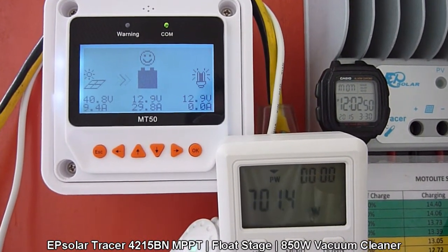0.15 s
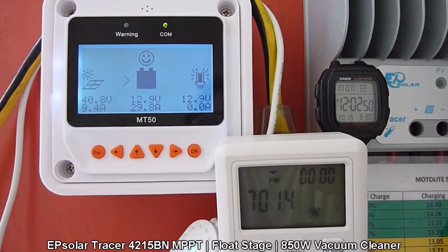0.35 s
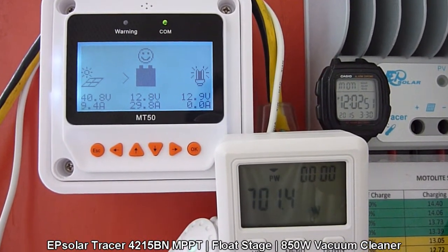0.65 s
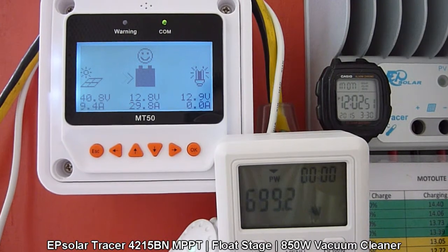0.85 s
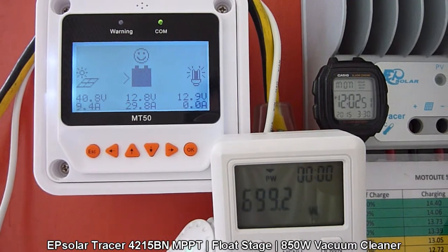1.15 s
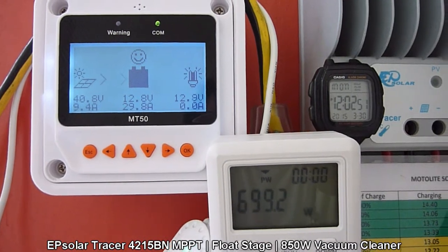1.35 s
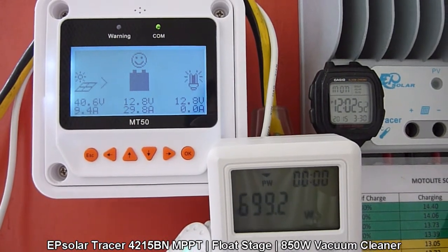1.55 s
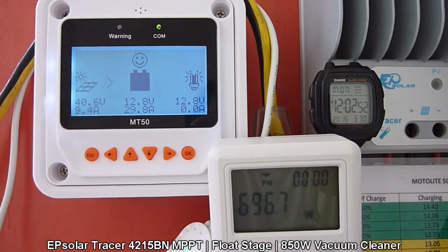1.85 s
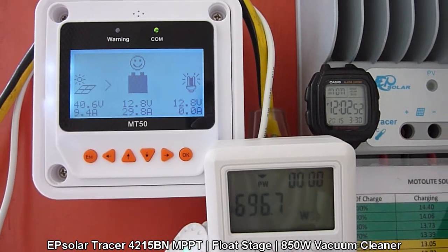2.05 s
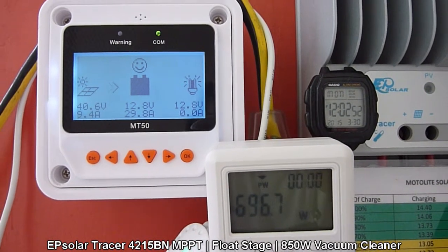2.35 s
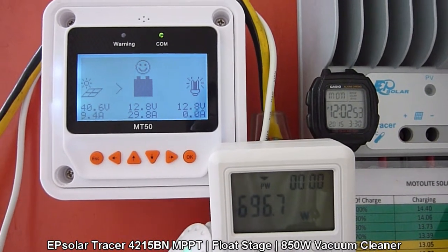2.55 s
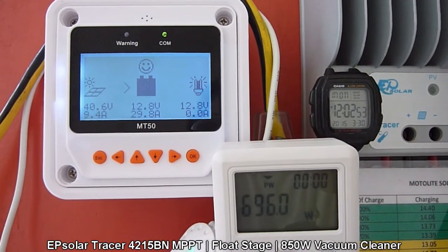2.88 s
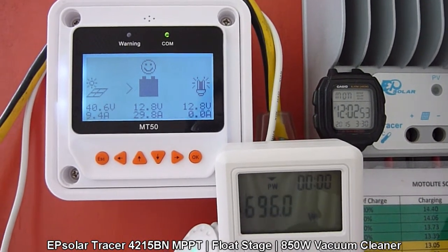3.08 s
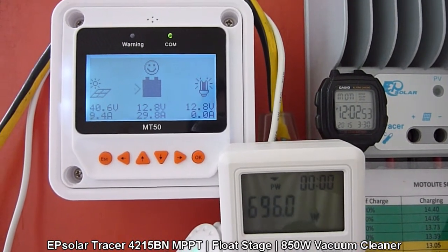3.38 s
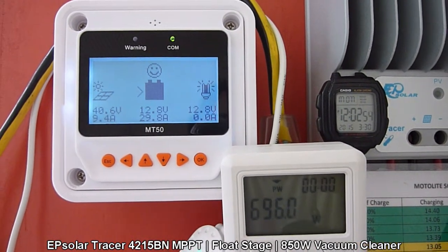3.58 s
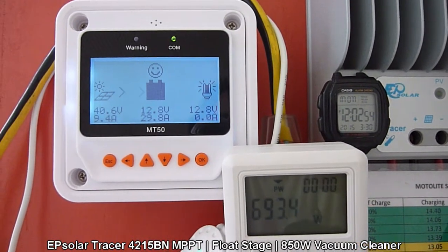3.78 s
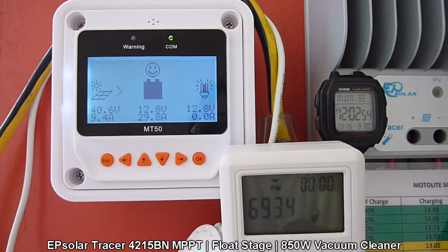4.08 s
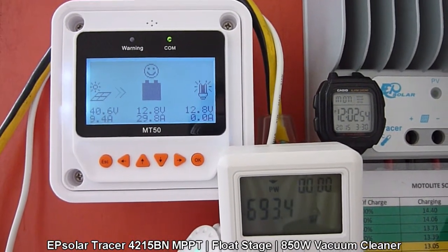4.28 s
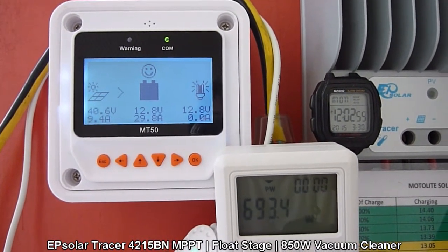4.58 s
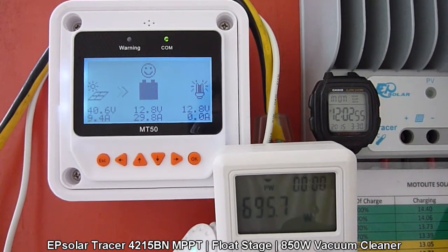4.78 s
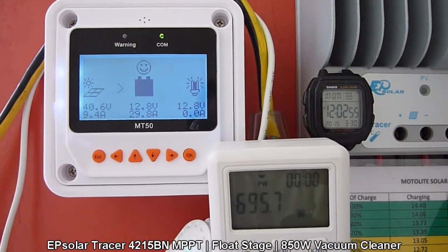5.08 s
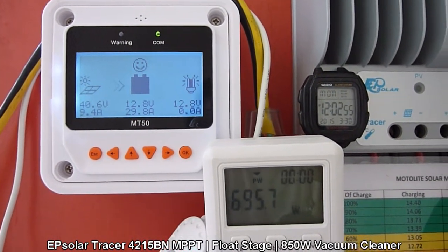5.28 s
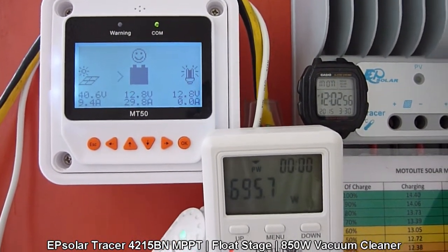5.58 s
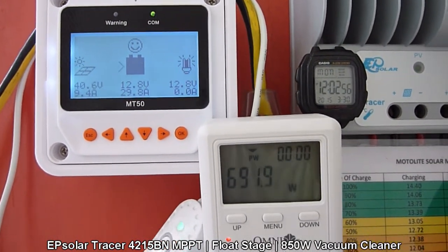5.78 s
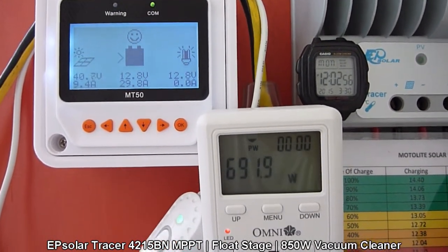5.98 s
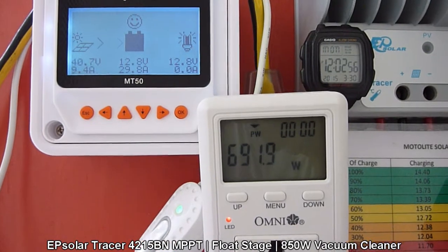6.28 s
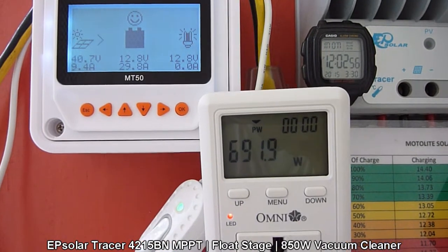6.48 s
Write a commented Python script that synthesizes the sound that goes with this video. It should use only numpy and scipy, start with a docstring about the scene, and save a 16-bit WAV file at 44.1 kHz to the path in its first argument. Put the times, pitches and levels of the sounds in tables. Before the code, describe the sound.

Unbroken indoor vacuum cleaner noise from start to finish, with no switching on or off. Hollow, boxy rushing air dominates; beneath it sits a smooth motor hum with faint electrical buzz, above it a narrow, piercing fan whine that wavers slightly in strength. Level stays almost flat. Heard through a small camera microphone in a hard little room, with restricted highs and a slight left lean.

```python
"""A vacuum cleaner runs steadily in a small hard room, slowing by a hair as it warms. Motor: sines at rotor
orders with mains sidebands, and a blade whine that follows its pitch at each port. Buzz: steady sines at mains
multiples. Air: noise shaped by many resonances, with echoes. A small camera with close stereo ports samples
slowly, so the treble returns faintly as a mirror image."""
import sys
import numpy as np
from scipy import signal
from scipy.fft import rfft, irfft
from scipy.io import wavfile

SR = 44100
rng = np.random.default_rng(int(sys.argv[2]) if len(sys.argv) > 2 else 0)


def int16_out(signal):
    """Quantize to a 16-bit WAV file."""
    q = np.round(np.clip(np.atleast_2d(signal).T, -1, 1) * 32767)
    wavfile.write(sys.argv[1], SR, q.astype(np.int16))


N = 292824
TIME_S = np.arange(N) / SR
HZ = np.maximum(np.fft.rfftfreq(N, 1 / SR), 1)

# magnetic buzz at multiples of the mains rate: [f/Hz, level/dB rms]
MAINS_BUZZ = [(60.2, -72), (120.4, -57.5), (240.75, -44.6)]


def from_db(db):
    """Amplitude gain of a level in dB."""
    return 10 ** (np.asarray(db) / 20)


def look_up(x, rows, left=None, right=None):
    """Table columns interpolated linearly at x, the first column being the key."""
    key, *columns = np.transpose(rows)
    return [np.interp(x, key, column, left=left, right=right) for column in columns]


def over_hz(points):
    """A short spectrum on the full frequency grid, linear in log frequency."""
    hz, values = np.array(points).T
    return np.interp(np.log(HZ), np.log(hz), values)


def sides(pan_db):
    """Left and right gains for a left-right level difference."""
    return from_db(np.array([pan_db / 2, -pan_db / 2]))


def drift(rate_hz):
    """Slow random drift of unit spread: white noise rolled off around rate_hz."""
    slow = irfft(rfft(rng.standard_normal(N)) / (1 + (HZ / rate_hz) ** 2), N)
    return slow / slow.std()


def tone(turns, level_db, waver_db):
    """A sine on a running phase in cycles, random start, its rms level wavering slowly."""
    wave = np.sin(2 * np.pi * (turns + rng.random()))
    gain = from_db(level_db + waver_db * drift(5.0))
    return np.sqrt(2) * gain * wave


def blade_whine(speed_hz, turns):
    """Fan blades pass at a multiple of rotor speed; the room answers unevenly at each port as pitch slides."""
    # room response to the whine: [f/Hz, left level/dB rms, right level/dB rms, left lead/cycles]
    whine_by_pitch = [(3176.5, -39.3, -40.5, .08), (3178, -39.2, -44, .06), (3180.5, -40.8, -44.5, .05),
                      (3181.5, -41.6, -46.8, .11), (3182.5, -42.8, -48.3, .18), (3183.3, -43.2, -48.5, .23),
                      (3184.4, -42.6, -47, .28), (3185.6, -42.2, -49.5, .37), (3186.6, -43.5, -50, .51),
                      (3188, -43, -52.5, .61), (3189.2, -44.5, -53, .65), (3191, -44, -50.5, .85),
                      (3192.4, -44.5, -53.5, .86), (3193.5, -43, -52, .95), (3195.3, -42.2, -52.8, 1.0)]
    blade_count = 12
    left_db, right_db, lead = look_up(blade_count * speed_hz, whine_by_pitch)
    # a short wave reaches the two ports at different points of its cycle
    port_turns = blade_count * turns + np.array([[1], [0]]) * lead
    return tone(port_turns, np.array([left_db, right_db]), waver_db=1.3)


def motor():
    """Blade whine and rotor orders; the pulsing mains torque puts a sideband on either side of each order."""
    # rotor speed: [t/s, speed/turns per s], before a small random drift
    rotor_speed = [(0, 266.33), (.3, 266.12), (.5, 266.04), (.7, 266.03), (1.1, 265.89), (1.3, 265.77),
                   (1.7, 265.62), (2.3, 265.46), (2.7, 265.27), (2.95, 265.28), (3.7, 265.16),
                   (3.9, 265.07), (4.12, 265.09), (4.28, 265.3), (4.6, 265.14), (4.9, 265.26),
                   (5.2, 265.24), (5.5, 265.0), (5.9, 264.77), (6.1, 264.68), (6.3, 264.76), (6.64, 264.74)]
    # rotor orders: [multiple of speed, level/dB rms before room gain, left-right/dB before room shift,
    # left lead/cycles, lower mains sideband re order/dB, upper mains sideband re order/dB]
    rotor_orders = [(1, -37.5, 2.1, .01, -33, -14), (2, -60, 2.1, .02, -30, -30),
                    (4, -57, 2.1, .05, -30, -30), (6, -44.3, 6.5, .13, -30, -30),
                    (7, -57, 1.5, .08, -30, -30), (14, -54.5, 0, .05, -8, -6),
                    (18, -69, 2.1, .07, -30, -30)]
    # room lifting or swallowing the orders as they slide: [f/Hz, gain/dB, left-right shift/dB]
    order_by_pitch = [(1588, 0, -2), (1591, 0, 0), (1594, 1, -1), (1596, -1, -2), (1598, -2.5, -4),
                      (1700, 0, 0), (3706, -2, 2), (3711, -3, 2), (3714, -1, 1), (3718, 3.5, -3),
                      (3722, 1, -8), (3725, -1, -12), (3728, -3, -8)]

    speed_hz = look_up(TIME_S, rotor_speed)[0] + .025 * drift(7.0)
    turns = np.cumsum(speed_hz) / SR
    pulsing = MAINS_BUZZ[1][0] * TIME_S
    left_only = np.array([[1], [0]])
    out = blade_whine(speed_hz, turns)
    for multiple, db, pan_db, lead, below_db, above_db in rotor_orders:
        order = multiple * turns + left_only * lead
        gain_db, shift_db = look_up(multiple * speed_hz, order_by_pitch, left=0, right=0)
        line = 0
        for shift, rel_db in [(-1, below_db), (0, 0), (1, above_db)]:
            line = line + tone(order + shift * pulsing, db + gain_db + rel_db, waver_db=.3)
        out += sides(pan_db + shift_db) * line
    return out


def buzz():
    """Steady magnetic tones from the windings at mains multiples."""
    hum = sum(tone(hz * TIME_S, db, waver_db=0.0) for hz, db in MAINS_BUZZ)
    return np.outer(sides(2.0), hum)


def resonances():
    """Power that the resonances add on top of the rush, one squared-Lorentzian peak a mode."""
    # resonances of the room: [f/Hz, width/Hz, relative density/dB per Hz]
    room_modes = [(164, 22, -18.4), (186, 12, -17.8), (217, 20, -8.6), (248, 20, -11.5), (290, 10, -9.0),
                  (339, 29, -9.7), (364, 12, -24.0), (409, 21, -7.0), (435, 14, -0.6), (471, 12, -18.7),
                  (512, 43, -8.2), (559, 12, -9.7), (598, 58, -13.5), (610, 22, -8.0), (660, 70, -14),
                  (709, 38, -8.2), (759, 28, -2.3), (782, 14, -7.9), (818, 24, -9.3), (853, 13, -10.1),
                  (880, 24, -5.3), (917, 21, -4.0), (965, 28, -3.6), (988, 12, -11.6), (1007, 15, -12.3),
                  (1040, 39, -4.9), (1081, 30, -4.7), (1118, 30, -9.4), (1152, 28, -5.0)]
    # further resonances of the same kind, from 1.2 to 2.3 kHz: [f/Hz, width/Hz, relative density/dB per Hz]
    middle_modes = [(1198, 46, -7.9), (1236, 52, -8.4), (1274, 20, -7.2), (1312, 22, -2.4),
                    (1333, 18, -3.8), (1353, 12, 0.3), (1383, 24, 0.2), (1415, 12, -6.5), (1428, 16, -2.6),
                    (1458, 26, -2.2), (1489, 26, -4.5), (1510, 14, -6.0), (1528, 15, -7.9),
                    (1566, 22, -4.0), (1581, 12, -6.5), (1608, 38, -2.2), (1638, 40, -5.5),
                    (1658, 18, -0.8), (1682, 24, -5.0), (1700, 14, -10), (1723, 20, -9.2), (1745, 16, -6.0),
                    (1773, 14, -11), (1798, 14, -1.0), (1822, 70, -7.3), (1860, 13, -3.9),
                    (1906, 70, -10.0), (1944, 25, -3.8), (1981, 18, -10.3), (2036, 27, -13.2),
                    (2075, 34, -8.8), (2134, 40, -15.3), (2194, 28, -14.4), (2243, 13, -14.0)]
    # still higher resonances of the same kind, from 2.3 to 5.3 kHz: [f/Hz, width/Hz, relative density/dB per
    # Hz]
    upper_modes = [(2291, 60, -18.5), (2420, 24, -13.5), (2543, 70, -16.2), (2634, 70, -15.5),
                   (2670, 18, -13.4), (2716, 54, -13.6), (2777, 50, -15.5), (2803, 30, -16.7),
                   (2842, 21, -14.0), (2880, 15, -11.4), (2951, 16, -18.6), (2995, 12, -18.0),
                   (3098, 56, -14.0), (3165, 30, -19), (3215, 40, -19), (3455, 50, -14.5), (3559, 29, -19.4),
                   (3596, 18, -13.8), (3841, 64, -20.6), (3984, 14, -24), (4022, 25, -25), (4119, 50, -23.5),
                   (4202, 12, -24.8), (4367, 29, -26.0), (4462, 12, -26.9), (4771, 39, -24.5),
                   (4837, 70, -25.6), (4972, 47, -28.1), (5072, 70, -29.2), (5203, 70, -25.6),
                   (5273, 70, -24.0)]
    power = 0
    for hz, width_hz, db in room_modes + middle_modes + upper_modes:
        off = 2 * (HZ - hz) / width_hz
        power = power + from_db(2 * db) / (1 + off ** 2) ** 2
    return power


def nulls():
    """Share of the power left by narrow nulls where reflections cancel the rush."""
    # cancellation nulls: [f/Hz, width/Hz, depth/dB]
    null_table = [(43, 14, -7), (86, 10, -5), (128, 10, -5), (145, 10, -5), (199, 10, -3), (302, 12, -3),
                  (417, 8, -5), (525, 7, -6), (864, 8, -5), (952, 7, -4), (977, 8, -5), (1262, 10, -3),
                  (1294, 10, -3), (1343, 8, -4), (1367, 10, -12), (1405, 10, -6), (1476, 9, -8),
                  (1628, 12, -4), (1674, 7, -3), (1735, 8, -4), (1762, 10, -4), (1787, 9, -5),
                  (1824, 10, -4), (1851, 9, -5), (1932, 9, -5), (1889, 10, -4), (2005, 24, -3),
                  (2104, 14, -4), (2347, 10, -5), (2557, 10, -5), (2616, 10, -5), (2745, 10, -5),
                  (2858, 9, -5), (2900, 14, -4), (2975, 16, -4), (3009, 9, -5)]
    share = 1
    for hz, width_hz, db in null_table:
        off = 2 * (HZ - hz) / width_hz
        share = share * (1 - (1 - from_db(2 * db)) / (1 + off ** 2))
    return share


def echo():
    """Spectrum of one random exponentially decaying tail of reflections, energy 1."""
    t60_s = 0.25
    tail = rng.standard_normal(N) * from_db(-60 * TIME_S / t60_s)
    return rfft(tail) / np.sqrt((tail ** 2).sum())


def air():
    """Rushing noise from inlet and outlet through fixed resonances, heard straight and through echoes."""
    # rush between resonances: [f/Hz, relative density/dB per Hz]
    rush_floor = [(30, -40), (60, -29), (75, -27), (100, -27.5), (135, -23), (170, -21), (300, -15),
                  (1000, -20), (1600, -16), (1950, -18.5), (2150, -20), (2350, -20.5), (3300, -19),
                  (5000, -28), (6300, -27), (6900, -36), (7400, -52)]
    # echo re straight sound, alike at both ports: [f/Hz, level/dB]
    shared_echo = [(2200, -22.5), (3000, -9), (5500, -5), (7400, 1)]
    # echo re straight sound, opposed between ports: [f/Hz, level/dB]
    opposed_echo = [(40, -20), (300, -30), (700, -23), (1150, -17), (1700, -14), (2400, -10), (3400, -7.5),
                    (4600, -6.5), (7400, -5.5)]
    # right port hearing later than left: [f/Hz, lag/rad]
    port_lag = [(100, .03), (700, .21), (1150, .36), (1700, .5), (2400, .6), (3400, .62), (4600, .45),
                (6000, .38), (6900, .26)]
    # balance of the rush: [f/Hz, left-right/dB]
    lean = [(40, 1.4), (200, 1.9), (700, 1.7), (1500, 2.4), (3000, 2.6), (7000, 1.5)]
    mean_db, swell_db, flutter_db = -29.5, 0.14, 0.41

    power = (from_db(2 * over_hz(rush_floor)) + resonances()) * nulls()
    # four noise sources, together near unit rms in the middle band
    middle = (HZ > 300) & (HZ < 2500)
    power /= 4 * power[middle].sum() * 2 / N

    shared = from_db(over_hz(shared_echo))
    opposed = from_db(over_hz(opposed_echo))
    late = np.exp(-1j * over_hz(port_lag) * np.array([[-.5], [.5]]))
    rush = 0
    for vent in range(2):
        alike = late * (1 + shared * echo()) / np.sqrt(1 + shared ** 2)
        for rim in range(2):  # each rim of a vent hisses on its own
            ports = alike + np.outer([1, -1], opposed * echo())
            rush = rush + rfft(rng.standard_normal(N)) * ports
    rush = irfft(rush * np.sqrt(power) * sides(over_hz(lean)), N)
    return rush * from_db(mean_db + swell_db * drift(.8) + flutter_db * drift(11.0))


def scene():
    """Motor, buzz and air together."""
    return motor() + buzz() + air()


def port_notch(x):
    """Narrow dip from the microphone port."""
    notch_hz, width_hz, depth_db = 5430, 490, -30
    off = 2 * (HZ - notch_hz) / width_hz
    notch = np.sqrt((off ** 2 + from_db(2 * depth_db)) / (off ** 2 + 1))
    return irfft(rfft(x) * notch, N)


def steep_low_pass(x, hz):
    """Elliptic wall above the given frequency."""
    return signal.sosfilt(signal.ellip(12, .5, 70, hz, fs=SR, output="sos"), x)


def mirror_image(band):
    """Treble mirrored about half the sampling rate: product with a cosine, then a falling leak."""
    # leak of the mirrored treble: [f/Hz, gain/dB]
    mirror_leak = [(8600, -8.5), (9500, -15.5), (11000, -28.5), (12000, -39.5), (12800, -48),
                   (13300, -52.5)]
    sampling_hz = 16000
    flipped = 2 * band * np.cos(2 * np.pi * sampling_hz * TIME_S)
    return irfft(rfft(flipped) * from_db(over_hz(mirror_leak)), N)


def record(dry):
    """Port notch, band limit, mirror image and a cut top."""
    edge_hz, cutoff_hz = 7420, 13300
    band = steep_low_pass(port_notch(dry), edge_hz)
    return steep_low_pass(band + mirror_image(band), cutoff_hz)


dry = scene()
out = record(dry)
int16_out(out)
```